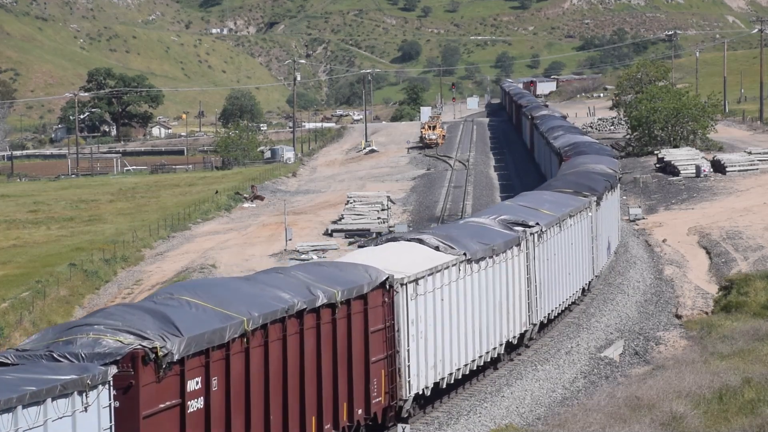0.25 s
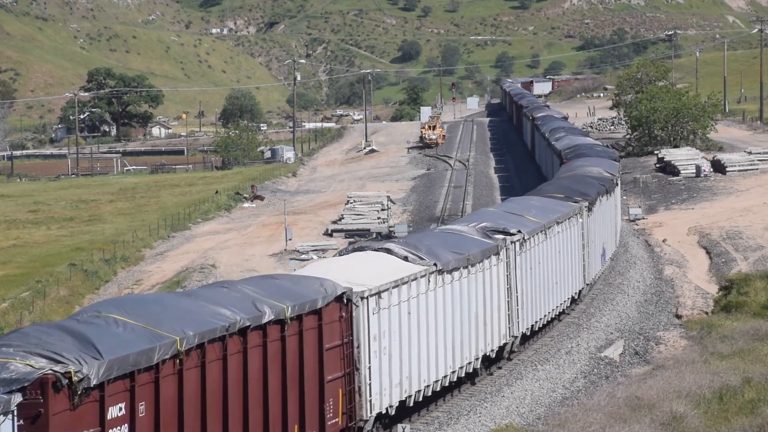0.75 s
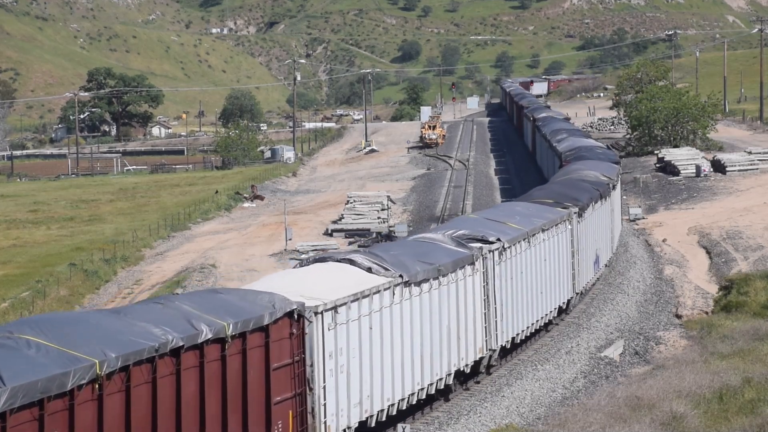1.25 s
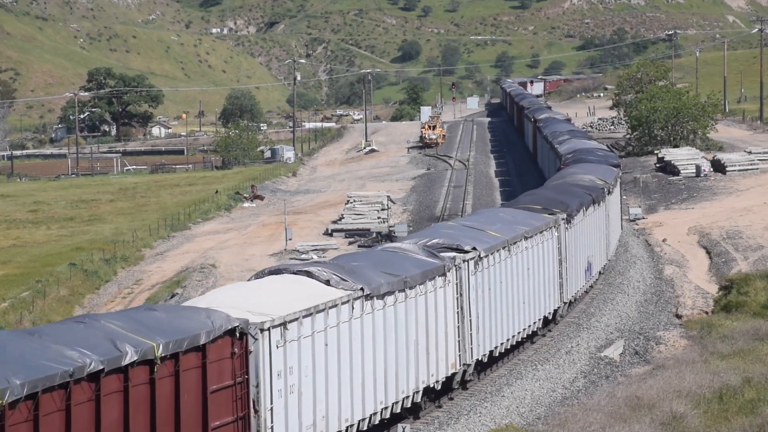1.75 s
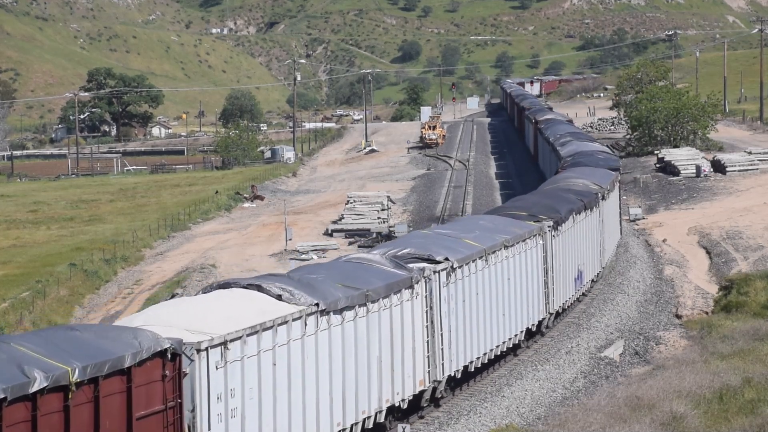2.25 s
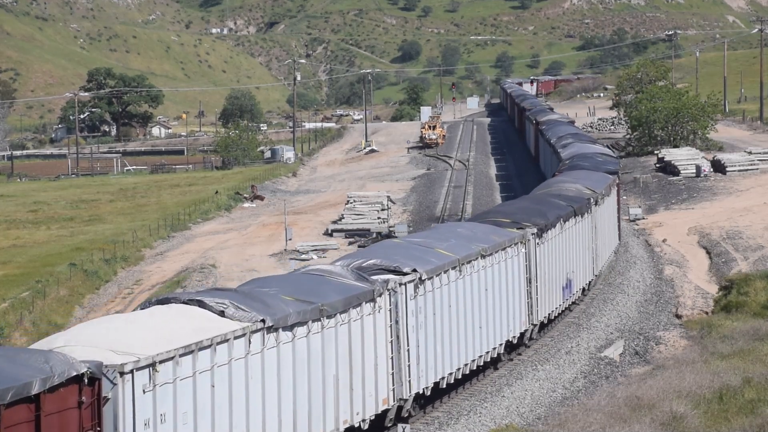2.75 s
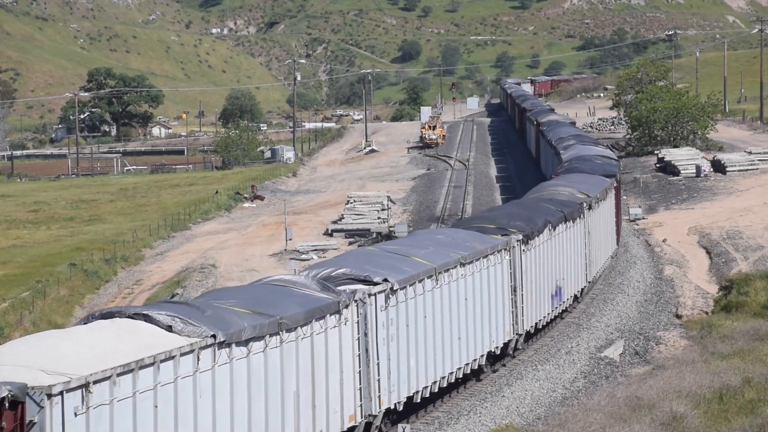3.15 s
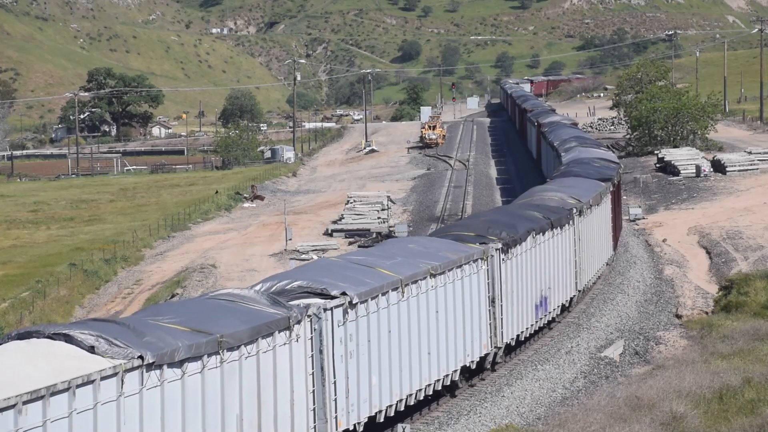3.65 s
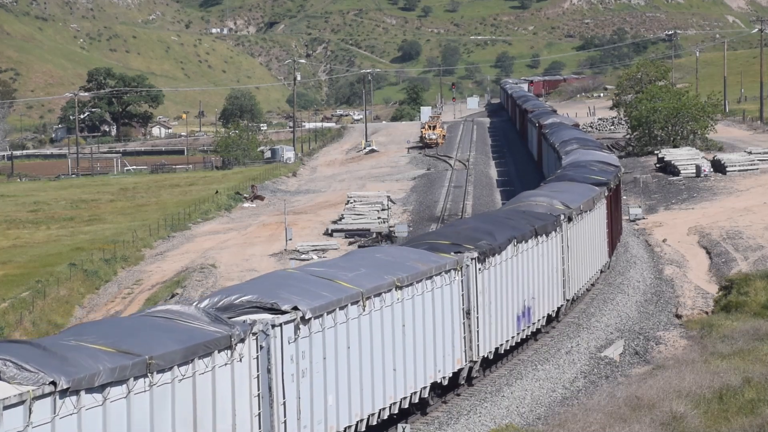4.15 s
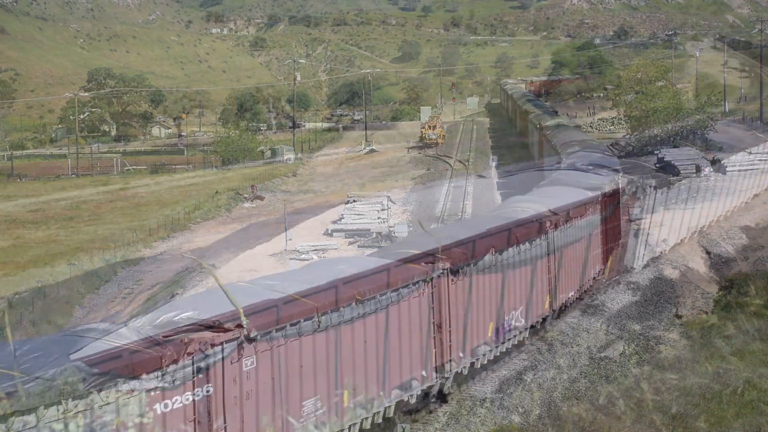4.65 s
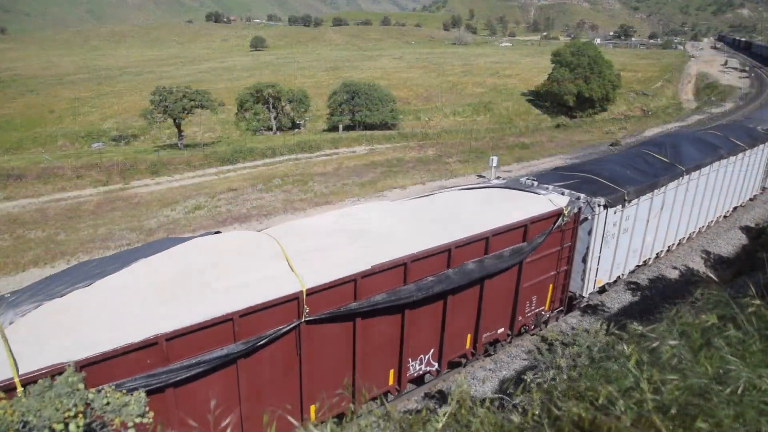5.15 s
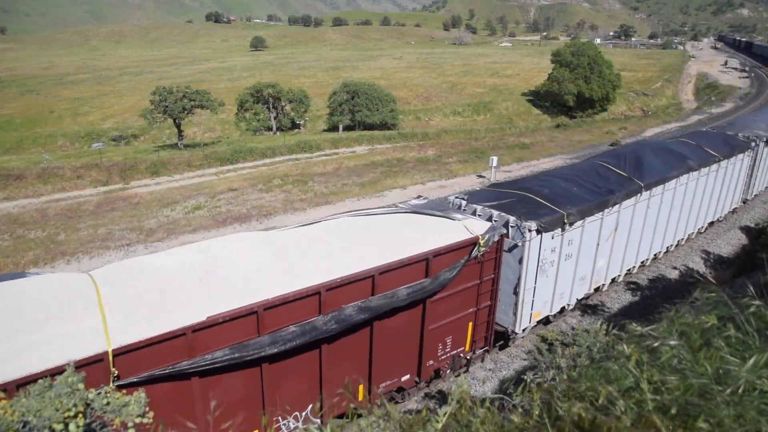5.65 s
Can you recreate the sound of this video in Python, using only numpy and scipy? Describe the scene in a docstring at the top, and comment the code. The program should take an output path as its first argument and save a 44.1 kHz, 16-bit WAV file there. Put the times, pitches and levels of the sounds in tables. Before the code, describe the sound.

Freight train wheels squeal faintly on a curve, then a close wheel screeches loudly with a wavering pitch and a bright metallic hiss.

```python
"""A freight train's wheels squeal as it creeps round a curve in an open valley, first far off, then close.
Each wheel sticks and slips on the rail, which makes it sing, and the slopes echo the squeals.
The flanges (the rims that keep the wheels on the track) grind and hiss, and the cars rumble and drone.
After about four seconds the couplings knock lightly and one loud wheel comes near."""
import sys
import numpy as np
from scipy import signal
from scipy.fft import rfft, irfft
from scipy.io import wavfile
from scipy.ndimage import uniform_filter1d

SR = 44100
rng = np.random.default_rng(int(sys.argv[2]) if len(sys.argv) > 2 else 0)


def pcm_store(signal):
    """Save signal as 16-bit PCM."""
    levels = np.round(np.clip(np.atleast_2d(signal), -1, 1) * 32767)
    wavfile.write(sys.argv[1], SR, levels.astype(np.int16).T)


N = 260043
TIME, FREQ = np.arange(N) / SR, np.maximum(np.fft.rfftfreq(N, 1 / SR), 1)

# squeals of two far wheels: start_s, length_s, first_pitch_hz, level_db, rise_s
LOW_SQUEALS = [(.58, 0.53, 2698, -55, .17), (1.27, 0.24, 2640, -56, 0.09), (1.55, .1, 2460, -61, .04),
               (1.87, 0.31, 2724, -41, .15), (2.24, 0.38, 2750, -46, .065), (2.84, 0.28, 2565, -46, .1),
               (3.1, 0.627, 2254, -39.5, 0.16), (3.8, 0.6, 2276, -39.5, .11),
               (4.54, .16, 2250, -42.5, 0.055)]
MID_SQUEALS = [(0, 0.028, 2785, -48.5, 0.0064), (.21, 0.21, 2838, -52.5, 0.074),
               (.45, 0.11, 2720, -60.5, 0.038), (.56, 0.15, 2640, -48.5, 0.041),
               (.72, .14, 2720, -54, 0.047), (.9, 0.09, 2660, -52.5, 0.037), (1.0, .2, 2850, -59, 0.041),
               (1.2, 0.23, 2620, -51, 0.091), (1.5, 0.11, 2820, -59, .05), (1.6, 0.11, 2644, -54, 0.049),
               (1.88, 0.22, 2605, -53.5, 0.034), (2.15, 0.14, 2780, -56.5, .05),
               (2.41, .14, 2747, -56, 0.038), (2.56, .14, 2618, -55.5, 0.054),
               (2.78, .25, 2770, -55, 0.037), (3.12, .12, 2890, -56.5, 0.051),
               (3.28, .08, 2710, -60, 0.035), (3.45, 0.093, 2740, -56.5, .05), (3.62, .26, 2600, -58.5, .2),
               (3.9, 0.22, 2750, -57.5, 0.046), (4.4, 0.088, 2850, -61, 0.04)]
# a higher far wheel: time_s, pitch_hz, level_db, second_harmonic_db
HIGH_WHEEL = [(0, 3311, -56, -77), (.25, 3270, -61, -89), (.75, 3340, -56, -85), (.9, 3267, -51, -77),
              (1.07, 3310, -54, -73), (1.15, 3227, -54, -72), (1.32, 3270, -51, -76),
              (1.43, 3377, -55, -90), (1.5, 3350, -52.5, -76), (1.74, 3330, -48, -74.5),
              (1.79, 3320, -61.5, -91), (2.1, 3295, -56.5, -73.5), (2.7, 3298, -60, -82),
              (2.9, 3254, -66, -86), (3.4, 3296, -61.5, -85.5), (4.05, 3277, -64, -83.5),
              (4.6, 3253, -67, -87)]
# the highest far wheel: time_s, pitch_hz, level_db
TOP_WHEEL = [(.1, 8740, -69), (.7, 8790, -72), (1.6, 8680, -71), (2.2, 8500, -73), (2.6, 8500, -72)]
# the low sound of all the cars: time_s, rumble_db, low_drone_db, high_drone_db
CAR_LEVELS = [(0, -57.5, -64, -61.5), (.3, -60.5, -67.5, -64.5), (.6, -60.5, -66, -60),
              (.95, -63.5, -70, -63.5), (1.4, -63.5, -65, -63), (2.0, -58.5, -68, -69.5),
              (2.3, -64.5, -72, -68), (2.42, -55, -61.5, -64), (2.7, -61, -64.5, -67.5),
              (2.9, -68, -64.5, -69.5), (3.8, -61.5, -66.5, -66.5), (4.45, -63, -67, -69.5),
              (4.85, -69, -77, -66), (5.1, -68, -84, -55.5), (5.4, -66, -72, -68.5), (5.9, -65, -73, -66.5)]
# far flanges: time_s, hiss_db, airy_top_db
FAR_FLANGES = [(0, -67, -73.5), (.6, -68, -78.5), (.72, -67.5, -89), (1.0, -70.5, -89), (1.15, -74.5, -87),
               (1.63, -73, -88), (1.67, -70, -75.5), (2.0, -67, -78), (2.55, -69, -76), (2.74, -72, -82),
               (3.02, -71, -80.5), (3.4, -72.5, -89), (3.65, -83, -88), (4.0, -73.5, -89), (4.35, -82, -96),
               (4.5, -75, -75)]
# the valley's quiet background: time_s, level_db
VALLEY_LEVELS = [(0, -56), (2.2, -56), (2.7, -57.5), (3.6, -57.5), (4.0, -57), (5.9, -59.5)]
# brief rings of the wheels: start_s, length_s, pitch_hz, level_db, wobble_radians
CHIRPS = [(.1, 0.065, 1730, -59.5, 0.66), (0.336, .08, 3920, -67, 1.8), (0.615, 0.32, 3445, -52.5, 1.3),
          (0.7, 0.083, 4130, -55.5, 2.1), (0.747, 0.077, 1745, -57.5, 0.42), (0.848, 0.22, 5780, -63, 2),
          (.96, 0.12, 3930, -61, 1.85), (.98, 0.065, 2490, -50, 0.55), (1.379, .06, 4050, -62, 2.6),
          (1.7, 0.073, 4060, -57, 1.54), (2.649, .12, 4010, -63, 2.5), (2.9, 0.12, 5630, -69, 2.7),
          (3.915, 0.18, 5680, -64, 2.7), (4.5, 0.059, 2063, -54, 1.5), (4.699, 0.14, 1158, -44.5, 0.83),
          (4.76, .1, 2550, -50, 2.2), (4.985, 0.13, 2297, -32.5, 0.39), (5.533, 0.058, 1156, -46, .6),
          (5.744, .12, 2033, -41.5, 1), (5.834, .06, 2490, -35, 0.94), (5.858, 0.083, 2870, -29, 0.48)]
# one far scrape: time_s, level_db
FAR_SCRAPE = [(3.66, -85), (3.7, -61), (3.9, -62), (4.08, -69), (4.13, -87)]
# knocks of the couplings: start_s, level_db
KNOCKS = [(4.291, -49), (5.08, -52), (5.419, -45), (5.58, -40.5)]
# notes of a knocked car body: pitch_hz, gain_db, ring_s (time to fade by 60 dB)
BODY_NOTES = [(332, -10, 0.089), (472, -8, 0.12), (690, -6.5, 0.1), (1080, -12, 0.052), (1870, -10, 0.027)]
# the nearest flange: time_s, hiss_db, grind_db
NEAR_FLANGE = [(4.3, -77.5, -71), (4.46, -67, -68), (4.51, -57, -60), (4.61, -48.5, -54),
               (4.72, -46.5, -56), (4.8, -51.5, -57.5), (4.96, -47, -47), (5.0, -40.5, -46),
               (5.07, -34, -42.5), (5.14, -34, -46), (5.19, -37, -48.5), (5.28, -33.5, -44.5),
               (5.55, -33, -41), (5.61, -35, -43), (5.68, -32, -41.5), (5.8, -31.5, -42),
               (5.897, -31.5, -36.5)]
# wheel notes that this flange keeps ringing: pitch_hz, gain_db (added to the hiss level)
FLANGE_RINGS = [(5350, -21), (5560, -14), (5700, -17), (5920, -19), (8280, -21)]
# the nearest wheel's squeal: time_s, level_db, second_harmonic_db
NEAR_WHEEL = [(4.36, -67.5, -71), (4.54, -43.5, -57), (4.63, -48, -54), (4.73, -34.5, -44),
              (4.8, -36.5, -43), (4.94, -35.5, -39.5), (5.02, -31.5, -44.5), (5.11, -25, -39),
              (5.17, -39, -35.5), (5.24, -24.5, -38.5), (5.4, -27, -41), (5.51, -20.5, -34),
              (5.58, -23.5, -42), (5.595, -40, -34), (5.61, -23.5, -40), (5.64, -27.5, -40),
              (5.68, -42.5, -46), (5.71, -31, -44), (5.75, -35, -47), (5.84, -24, -40.5),
              (5.897, -22.5, -45)]
# turns of that wheel: start_s, pitch_arch_hz, arch_share (1 is a whole arch), scrape_surge_db
TURNS = [(4.39, 125, 0.81, 9.5), (4.785, 157, .85, 5.5), (5.18, 154.6, 0.94, 14), (5.585, 175.3, .93, 12.5)]
# the nearest car rolling: time_s, level_db
NEAR_ROLL = [(4.5, -77), (4.7, -66), (5.1, -53), (5.8, -55.5), (5.897, -52)]
# a low hum close by: time_s, pitch_hz, level_db
NEAR_HUM = [(4.7, 99, -79), (4.85, 100.8, -66), (5.3, 99, -65.5), (5.6, 100.6, -67), (5.9, 96.1, -69)]

# the colour of each noise, or how strong its lows and highs are: frequency_hz, relative_level_db
RUMBLE_COLOUR = [(15, -56), (25, -16.5), (40, -10), (59, 5), (72, 2.5), (97, -2.5), (140, -4), (180, -41),
                 (310, -120)]
LOW_DRONE_COLOUR = [(110, -20), (140, -7), (160, 0), (180, -5), (200, -16)]
HIGH_DRONE_COLOUR = [(180, -11), (205, -5), (222, 4.5), (245, -15), (300, -15)]
FAR_HISS_COLOUR = [(2180, -35), (3700, -1), (4370, -9.5), (4930, -4), (5390, 4), (6070, -2), (6630, -2),
                   (7530, -1), (9000, -4.5), (11700, -29), (19800, -120)]
AIRY_TOP_COLOUR = [(5290, -21), (9000, -10), (9410, -5.5), (11200, -5.5), (15100, -20), (15700, -18.5)]
VALLEY_COLOUR = [(140, -30), (240, -2.5), (335, -8), (621, -10.5), (816, -10.5), (994, -4.5), (1240, -9),
                 (2090, -9), (2740, -1.5), (3020, -4), (3300, -10), (3420, -1), (3770, -29.5), (4600, -41),
                 (5980, -54), (10100, -120)]
FAR_SCRAPE_COLOUR = [(900, 2.5), (1700, 2.5), (3000, -1), (4400, -8), (5700, -6), (7200, -16), (8500, -27)]
NEAR_HISS_COLOUR = [(2350, -53.5), (4000, -11.5), (4140, -9), (4540, -11), (5390, -3), (5710, 3),
                    (6010, -2.5), (7560, -1), (8480, -4), (8820, -8), (10100, -8.5), (15700, -18)]
NEAR_SCRAPE_COLOUR = [(2300, -14), (2650, 5), (2900, 10.5), (3200, 4), (3600, 11), (3900, 6.5), (4200, -13)]
GRIND_COLOUR = [(900, -13), (1200, -10), (1700, -5.5), (2100, 1.5), (2500, -1.5), (2900, -43)]
ROLL_COLOUR = [(150, -43), (250, -24), (301, -7.5), (447, -5), (534, -8), (779, -6), (1150, -3),
               (1500, -22), (2530, -120)]
MIC_HISS_COLOUR = [(3000, 6), (5000, -5), (9000, -8), (12000, -7), (16000, -6)]

# how much louder far and near sounds are on the left: frequency_hz, left_minus_right_db
FAR_BALANCE = [(60, -1.5), (110, -1.5), (200, -0.5), (380, 1.0), (700, 2.0), (1290, 0.0), (2380, -2.0),
               (4400, -4.0), (8120, 1.5), (15000, -0.5)]
NEAR_BALANCE = [(60, -0.5), (110, -0.5), (200, -0.5), (380, -0.5), (700, 0.0), (1290, -3.0), (2380, -2.5),
                (4400, 2.0), (8120, 0.5), (15000, -3.0)]
# how far ahead their waves are on the left: frequency_hz, left_lead_radians
FAR_PHASE = [(30, 0), (1100, .2), (3450, .9), (8000, 2.2), (15500, 4.)]
NEAR_PHASE = [(30, 0), (1400, .2), (3100, .5), (4480, 2.2), (5100, .8), (7060, 1.1), (9000, 2.),
              (12000, 2.2), (15400, 3.2)]
FAR, NEAR = (FAR_BALANCE, FAR_PHASE), (NEAR_BALANCE, NEAR_PHASE)


def undb(db):
    """Turn decibels into a number to multiply a sound by."""
    return 10 ** (np.asarray(db) / 20)


def curves(table):
    """Each column after the time as a curve, then a gate that fades in and out at the table's ends."""
    times, *columns = np.transpose(table)
    gate = np.clip(np.minimum(TIME - times[0] + .045, times[-1] + .05 - TIME) / .014, 0, 1)
    return [np.interp(TIME, times, column) for column in columns] + [gate]


def over_freq(table):
    """A table's value at every frequency."""
    hz, value = np.transpose(table)
    return np.interp(np.log(FREQ), np.log(np.maximum(hz, 1)), value)


def wander(rate_hz):
    """A smooth random curve of typical size 1 that heads somewhere new rate_hz times a second."""
    hold = max(int(SR / rate_hz), 2)
    steps = np.repeat(rng.standard_normal(N // hold + 1), hold)
    smooth = uniform_filter1d(uniform_filter1d(steps, hold), hold)[:N]
    return smooth / smooth.std()


def noise(colour, flicker_db, rate_hz):
    """Coloured noise of strength 1, in bands a third of an octave wide that each flicker on their own."""
    low_hz, high_hz = colour[0][0], colour[-1][0]
    inside = (FREQ > low_hz) & (FREQ < high_hz)
    spectrum = rfft(rng.standard_normal(N)) * undb(over_freq(colour)) * inside
    band_number = 3 * np.log2(FREQ / low_hz)
    out = 0
    for k in range(int(3 * np.log2(high_hz / low_hz)) + 2):
        band = irfft(spectrum * np.clip(1 - abs(band_number - k), 0, 1), N)
        out = out + band * undb(flicker_db * wander(rate_hz))
    return out / out.std()


def stereo(sound, direction):
    """One sound reaches the left and right microphones with different strength and timing."""
    balance, phase = direction
    left = undb(over_freq(balance) / 2) * np.exp(.5j * over_freq(phase))
    end_fades = np.clip(np.minimum(TIME, TIME[::-1]) / .002, 0, 1)
    return irfft(rfft(sound * end_fades) * np.array([left, 1 / left]), N)


def wide_noise(colour, direction, flicker_db, rate_hz, scatter_db):
    """Noise from one direction, plus a scattered part that is unrelated left and right."""
    scattered = np.array([noise(colour, flicker_db, rate_hz) for _ in range(2)])
    return stereo(noise(colour, flicker_db, rate_hz), direction) + undb(scatter_db) * scattered


def stick_slip(hz, harmonics_db, jitter, rough, rate_hz, rasp_db):
    """Steel sticks and slips: the pitch shakes, an unsteady grip blurs the tone, a fast rasp frays it."""
    phase = 2 * np.pi * np.cumsum(hz * (1 + jitter * wander(rate_hz))) / SR
    out = 0
    for k, db in enumerate(harmonics_db, 1):
        rough_share = min(rough * k * k, 1)
        shake = wander(rate_hz * k) + 1j * wander(rate_hz * k)  # shakes both strength and phase
        grip = np.sqrt(1 - rough_share) + np.sqrt(rough_share / 2) * shake
        rasp = undb(rasp_db) * k ** 1.5 * (wander(330 * k) + 1j * wander(330 * k)) / np.sqrt(2)
        out = out + np.sqrt(2) * undb(db) * ((grip + rasp) * np.exp(1j * k * phase)).real
    return out


def squeal_curves(table, note_hz, slide_rises, fade_db):
    """Pitch and level of a wheel that catches, swells as it slides onto its note, fades and lets go."""
    swell_db, catch_db_per_s, let_go_db_per_s = 16, 3000, 251.5
    start_s, length_s, first_hz, db, rise_s = np.transpose(table)[:, :, None]
    age = TIME - start_s
    level = (db - catch_db_per_s * np.maximum(-age, 0)
             - swell_db * np.clip(1 - age / rise_s, 0, 1)
             - fade_db * np.maximum(age - rise_s, 0) / length_s
             - let_go_db_per_s * np.maximum(age - length_s, 0))
    slide_s = slide_rises * rise_s
    pitch = note_hz + (first_hz - note_hz) * np.exp(-np.maximum(age, 0) / slide_s)
    loudest = level.argmax(axis=0)  # the wheel sings one squeal at a time
    return pitch[loudest, np.arange(N)], level.max(axis=0)


def far_wheels():
    """Four far wheels stick and slip, each singing roughly around its own note."""
    hz, db = squeal_curves(LOW_SQUEALS, note_hz=2270, slide_rises=.55, fade_db=14)
    low = stick_slip(hz, [db, db - 35, db - 39], jitter=.0015, rough=.65, rate_hz=70, rasp_db=-7)
    hz, db = squeal_curves(MID_SQUEALS, note_hz=2686, slide_rises=8, fade_db=6.5)
    hz = hz * (1 + .006 * wander(14))
    mid = stick_slip(hz, [db, db - 29], jitter=.01, rough=.85, rate_hz=120, rasp_db=-2)
    hz, db, second_db, gate = curves(HIGH_WHEEL)
    hz = hz * (1 + .002 * wander(14))
    second_db = second_db + 4 * wander(12)
    high = gate * stick_slip(hz, [db, second_db], jitter=.006, rough=.7, rate_hz=100, rasp_db=-4)
    hz, db, gate = curves(TOP_WHEEL)
    top = gate * stick_slip(hz, [db + 3 * wander(12)], jitter=.02, rough=.9, rate_hz=300, rasp_db=-1)
    return low + mid + high + top


def slope_echo(sound, level_db, ring_s=.3):
    """The ground and hillsides send back a blurred echo, different left and right."""
    t = np.arange(int(SR * .6)) / SR
    tail = rng.standard_normal((2, len(t))) * undb(-60 * t / ring_s) * (t > .012)
    tail /= np.linalg.norm(tail, axis=1, keepdims=True)
    return undb(level_db) * signal.fftconvolve(sound[None], tail, axes=1)[:, :N]


def car_rumble():
    """All the cars together make a deep rumble and two drones, each wavering a little."""
    rumble_db, low_db, high_db, _ = curves(CAR_LEVELS)
    rumble = wide_noise(RUMBLE_COLOUR, FAR, flicker_db=1.15, rate_hz=4.6, scatter_db=-16)
    low = wide_noise(LOW_DRONE_COLOUR, FAR, flicker_db=1.1, rate_hz=26, scatter_db=-10.5)
    high = wide_noise(HIGH_DRONE_COLOUR, FAR, flicker_db=1.1, rate_hz=26, scatter_db=-10.5)
    return sum(undb(db + 1.2 * wander(7)) * layer
               for db, layer in ((rumble_db, rumble), (low_db, low), (high_db, high)))


def far_flanges():
    """Far flanges rub the rail and hiss, with an airy top."""
    hiss_db, top_db, gate = curves(FAR_FLANGES)
    hiss = wide_noise(FAR_HISS_COLOUR, FAR, flicker_db=1.4, rate_hz=7.16, scatter_db=3.4)
    top = wide_noise(AIRY_TOP_COLOUR, FAR, flicker_db=1.1, rate_hz=11, scatter_db=6.4)
    return gate * (undb(hiss_db) * hiss + undb(top_db) * top)


def valley():
    """The open valley's quiet, nearly steady background noise."""
    db, _ = curves(VALLEY_LEVELS)
    return undb(db) * wide_noise(VALLEY_COLOUR, FAR, flicker_db=.47, rate_hz=11, scatter_db=-7.5)


def wheel_chirps():
    """Single wheel notes ring briefly; the more one wobbles, the more its loudness flutters."""
    out = 0
    for start_s, length_s, hz, db, wobble in CHIRPS:
        swell = np.sin(np.pi * np.clip((TIME - start_s) / length_s, 0, 1)) ** .6
        gain = undb(db + 1.6 * wobble * wander(70))
        out = out + gain * swell * np.sin(2 * np.pi * hz * TIME + wobble * wander(110))
    return out


def far_scrape():
    """A far flange drags along the rail for a moment."""
    db, gate = curves(FAR_SCRAPE)
    scrape = wide_noise(FAR_SCRAPE_COLOUR, FAR, flicker_db=1.5, rate_hz=11, scatter_db=-1.9)
    return gate * undb(db) * scrape


def coupling_knocks():
    """Each knock rings the car body, with every note a bit louder or softer by chance."""
    out = np.zeros(N)
    for start_s, db in KNOCKS:
        age = np.maximum(TIME - start_s, 0)
        for hz, gain_db, ring_s in BODY_NOTES:
            strike_db = db + gain_db + 3.1 * rng.standard_normal()
            out += undb(strike_db - 60 * age / ring_s) * np.sin(2 * np.pi * hz * age)
    return out


def wheel_turn(last_turn_ends_s=5.95):
    """How far the nearest wheel is through its turn (0 to 1), then that turn's arch, share and surge."""
    table = np.array(TURNS)
    turns = np.interp(TIME, [*table[:, 0], last_turn_ends_s], np.arange(len(table) + 1))
    row = np.minimum(turns.astype(int), len(table) - 1)
    return turns % 1, *table[row, 1:].T


def near_flange():
    """Steel grinds on steel: a bright hiss, faint rings, a duller grind and a scrape late in each turn."""
    hiss_db, grind_db, gate = curves(NEAR_FLANGE)
    progress, *_, surge_db = wheel_turn()
    surge_at_turns, surge_width_turns = .766, .13
    surge = np.exp(-((progress - surge_at_turns) / surge_width_turns) ** 2)
    scrape_db = hiss_db - 14.5 + surge_db * surge
    hiss = wide_noise(NEAR_HISS_COLOUR, NEAR, flicker_db=1.4, rate_hz=25, scatter_db=-6)
    rings = 0
    for hz, gain_db in FLANGE_RINGS:
        ring_db = hiss_db + gain_db + 3.5 * wander(12)
        rings = rings + stick_slip(hz, [ring_db], jitter=.003, rough=1, rate_hz=120, rasp_db=-6)
    scrape = wide_noise(NEAR_SCRAPE_COLOUR, NEAR, flicker_db=1.8, rate_hz=25, scatter_db=-8)
    grind = wide_noise(GRIND_COLOUR, NEAR, flicker_db=1.8, rate_hz=20, scatter_db=-9)
    rubbing = undb(hiss_db) * hiss + undb(scrape_db) * scrape + undb(grind_db) * grind
    return gate * (rubbing + stereo(rings, NEAR))


def near_wheel(base_hz=1371):
    """The loud wheel sticks and slips; its pitch arches once per turn, then jumps back down."""
    db, second_db, gate = curves(NEAR_WHEEL)
    progress, arch_hz, arch_share, _ = wheel_turn()
    hz = base_hz + arch_hz * np.sin(np.pi * arch_share * progress ** .8)  # quick climb, slow fall
    return gate * stick_slip(hz, [db, second_db], jitter=.005, rough=.18, rate_hz=75, rasp_db=-14)


def near_roll():
    """The nearest car rolls along the rail with a dull rush."""
    db, gate = curves(NEAR_ROLL)
    return gate * undb(db) * wide_noise(ROLL_COLOUR, NEAR, flicker_db=1.8, rate_hz=15, scatter_db=-13)


def near_hum():
    """A faint, low, unsteady hum comes in while the train is close."""
    hz, db, gate = curves(NEAR_HUM)
    return gate * stick_slip(hz, [db], jitter=.018, rough=.29, rate_hz=7.4, rasp_db=-24)


def scene():
    """Far and near squeals with their echoes, over the noise of the train and the valley."""
    far = far_wheels()
    near = near_wheel() + wheel_chirps() + coupling_knocks()
    return (stereo(far, FAR) + slope_echo(far, level_db=-5.5)
            + stereo(near, NEAR) + slope_echo(near, level_db=-16)
            + near_flange() + near_roll() + far_scrape()
            + car_rumble() + near_hum() + far_flanges() + valley())


def record(dry):
    """The microphones add their own faint hiss, and the highest treble is cut off."""
    hiss_db, top_hz = -71, 15780
    hiss = np.array([noise(MIC_HISS_COLOUR, flicker_db=.3, rate_hz=5) for _ in range(2)])
    treble_cut = signal.ellip(10, .2, 80, top_hz, fs=SR, output="sos")
    return signal.sosfilt(treble_cut, dry + undb(hiss_db) * hiss)


dry = scene()
out = record(dry)
pcm_store(out)
```